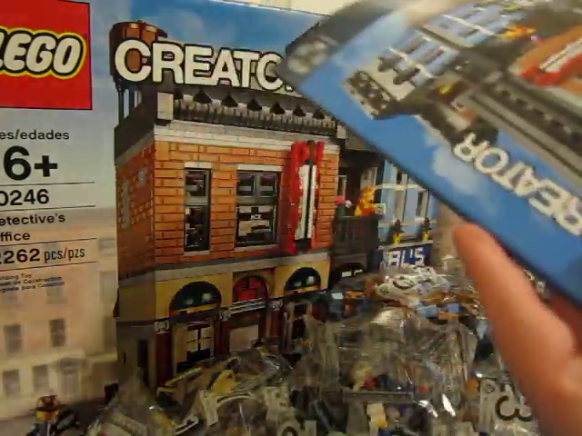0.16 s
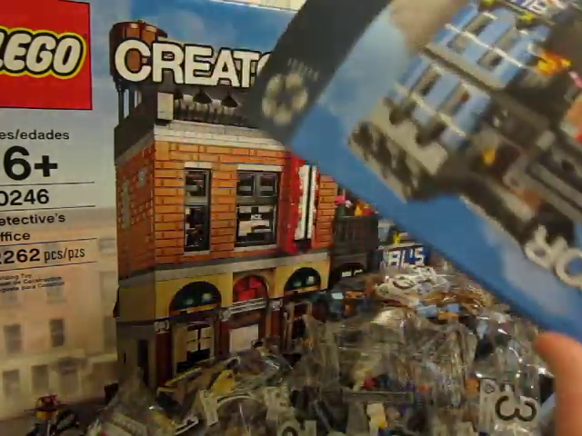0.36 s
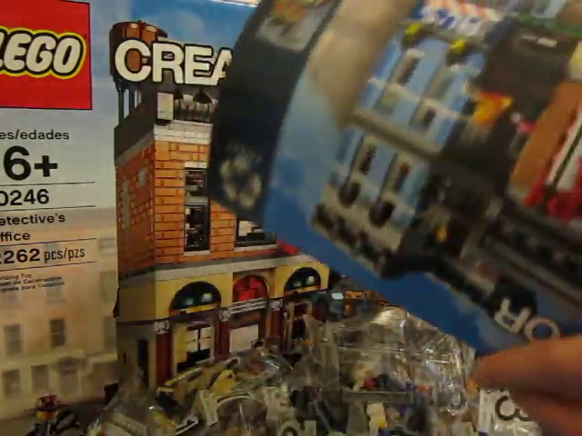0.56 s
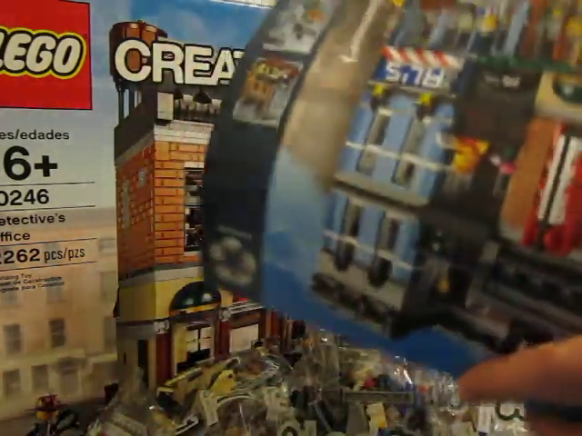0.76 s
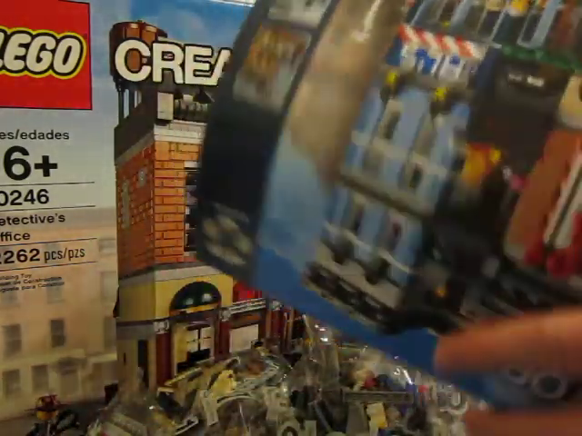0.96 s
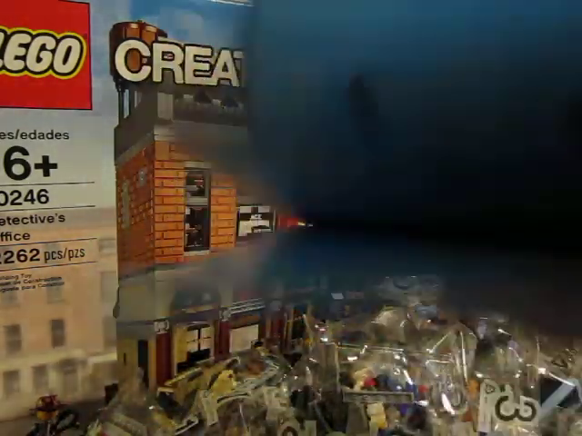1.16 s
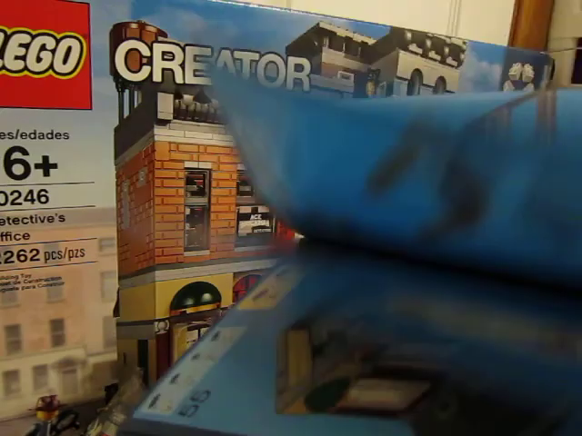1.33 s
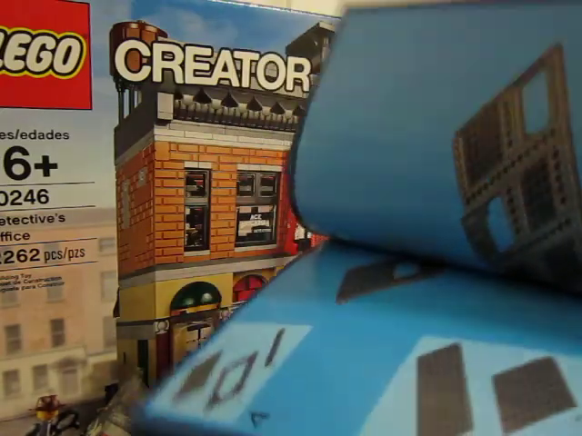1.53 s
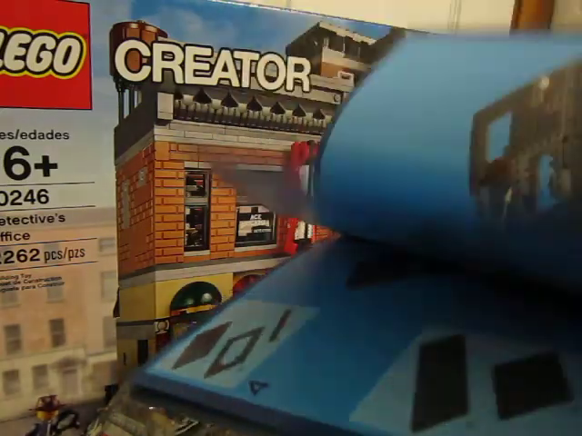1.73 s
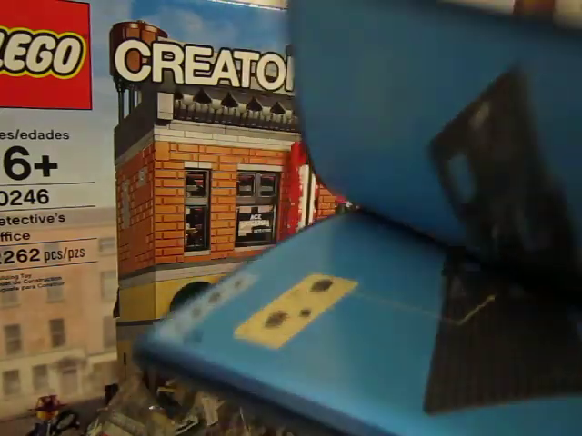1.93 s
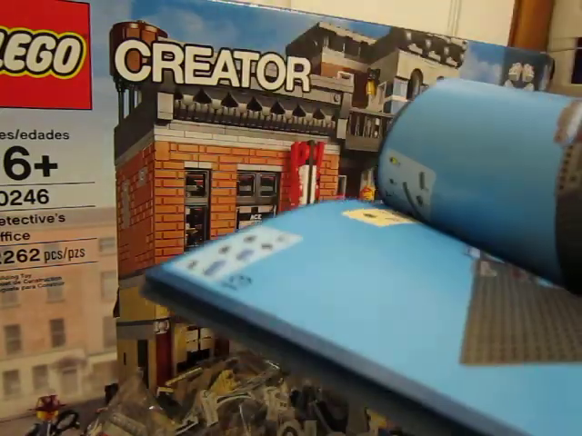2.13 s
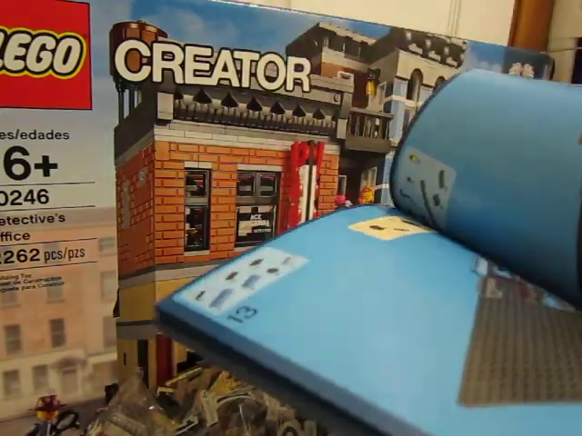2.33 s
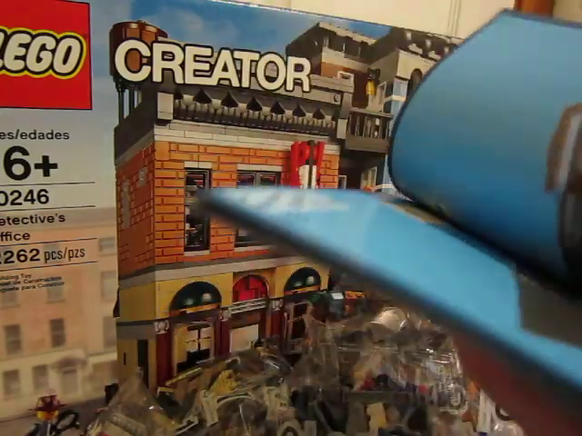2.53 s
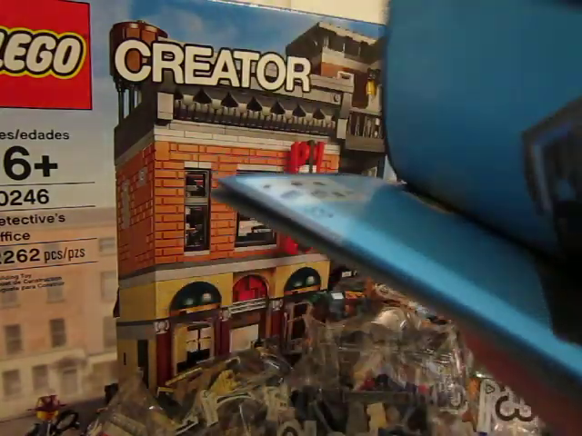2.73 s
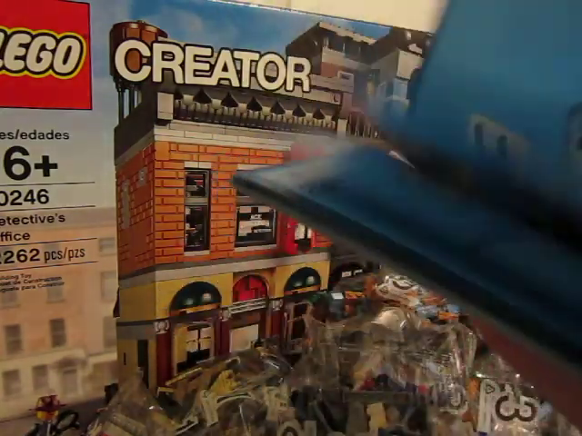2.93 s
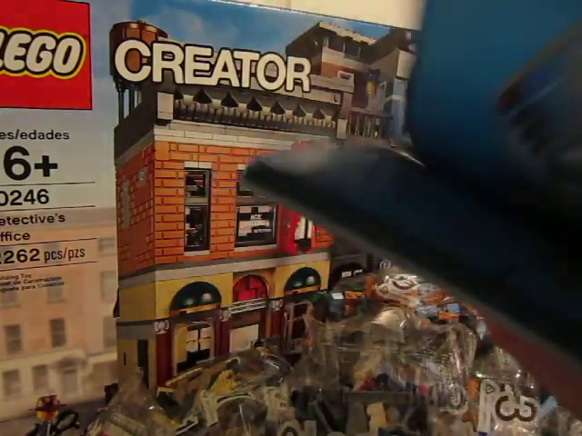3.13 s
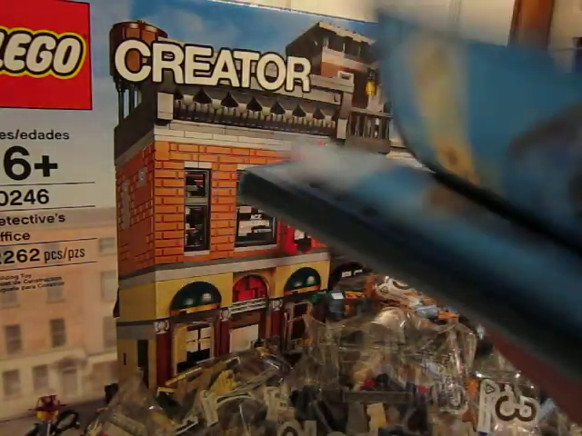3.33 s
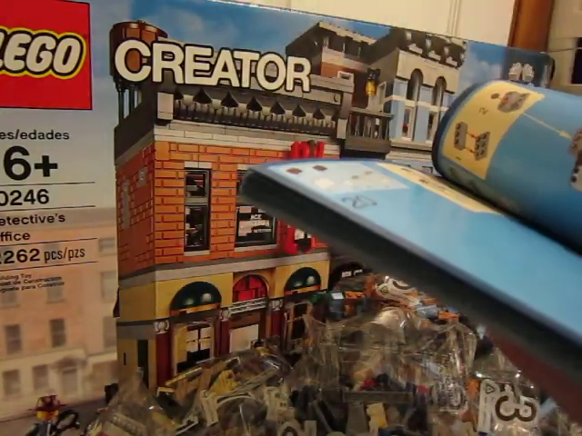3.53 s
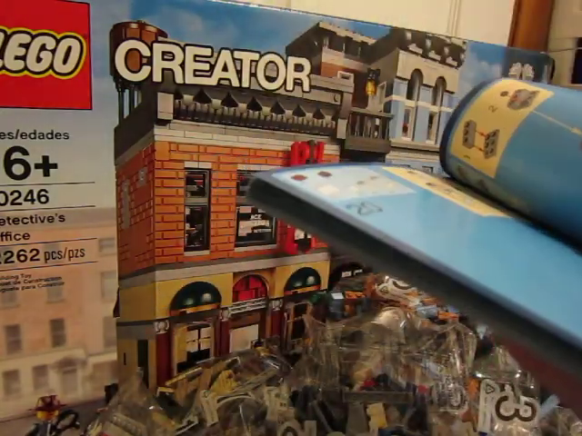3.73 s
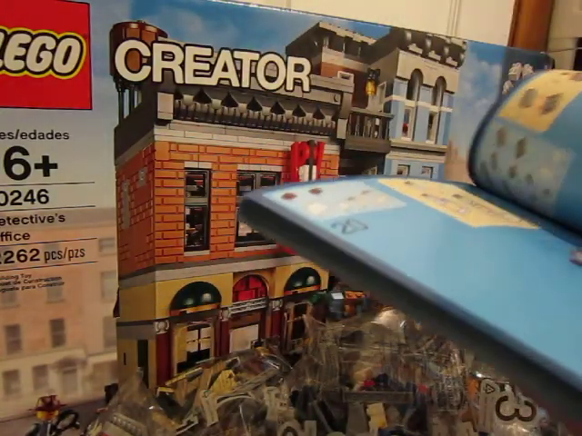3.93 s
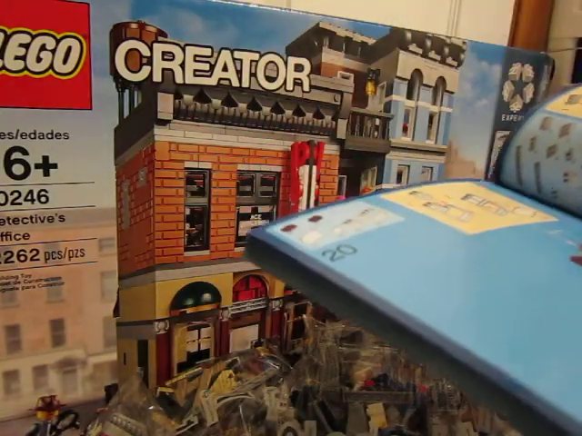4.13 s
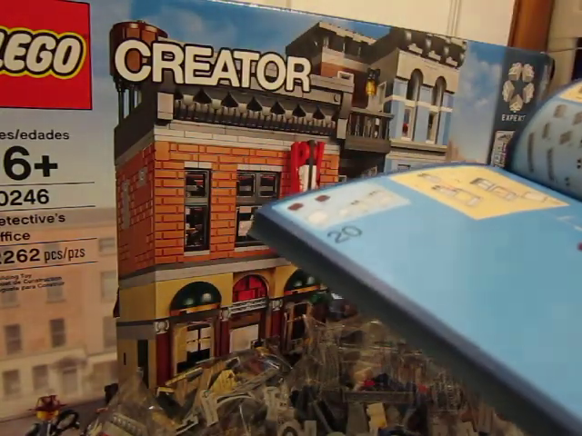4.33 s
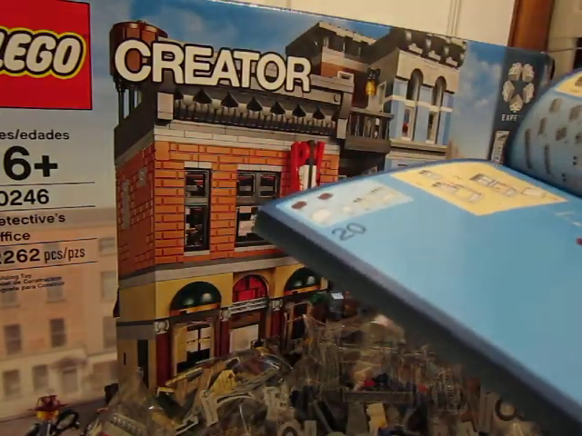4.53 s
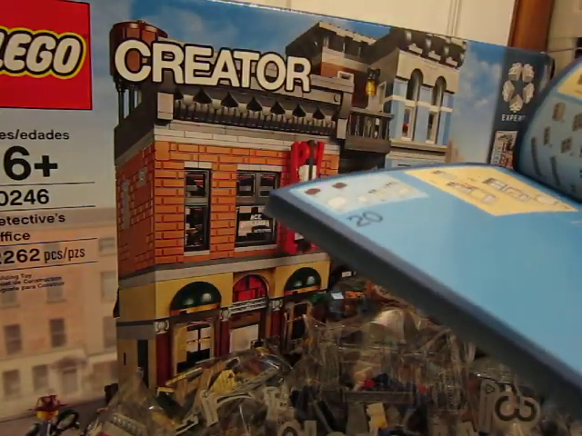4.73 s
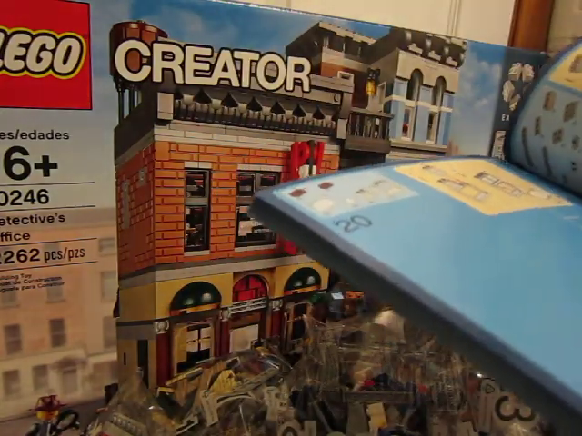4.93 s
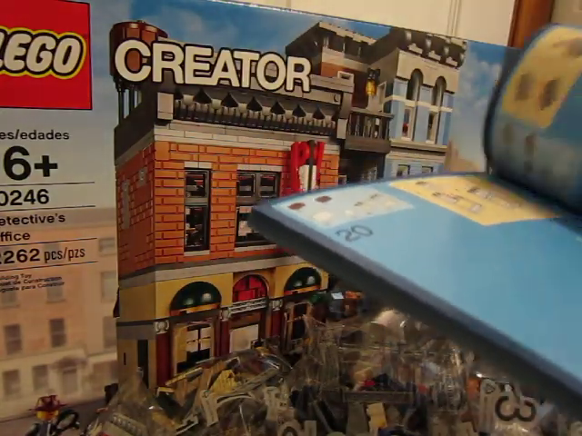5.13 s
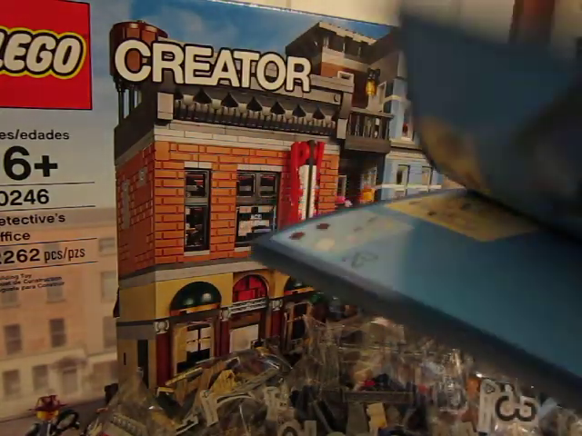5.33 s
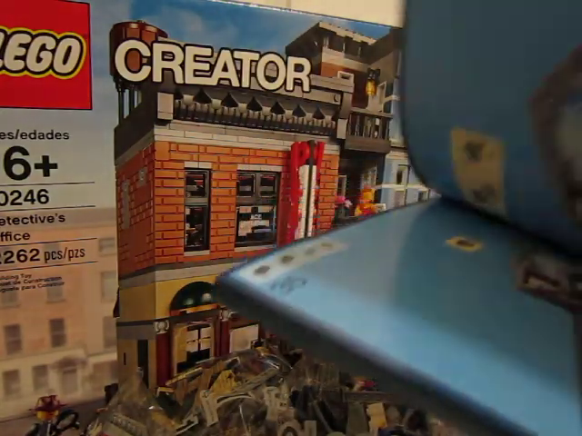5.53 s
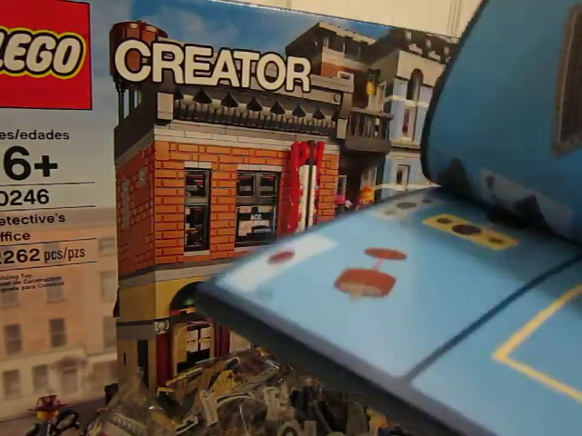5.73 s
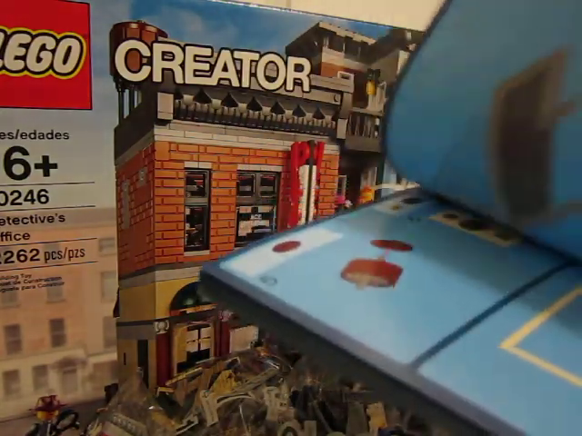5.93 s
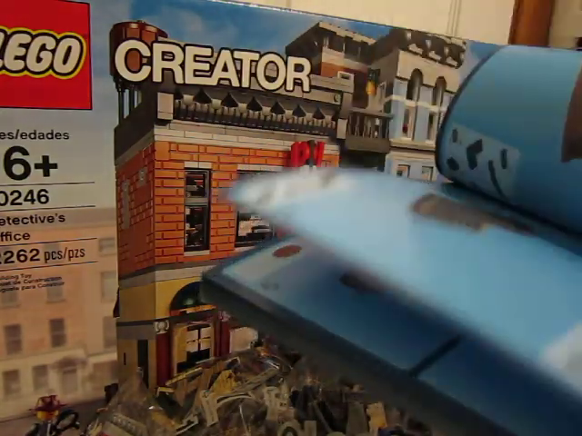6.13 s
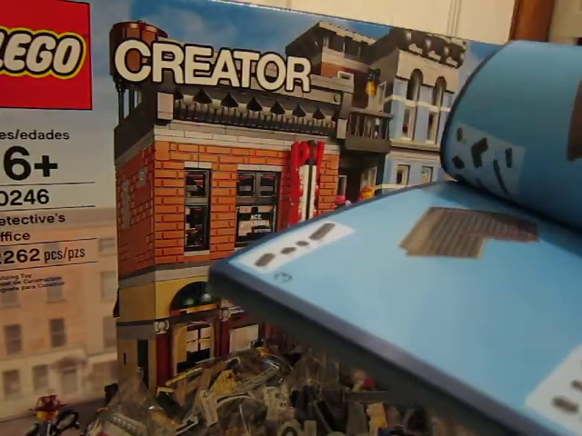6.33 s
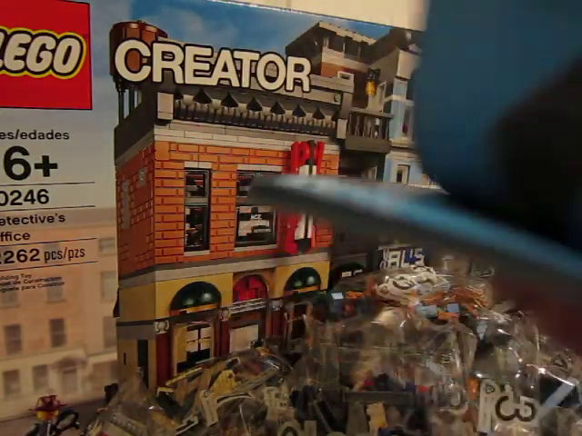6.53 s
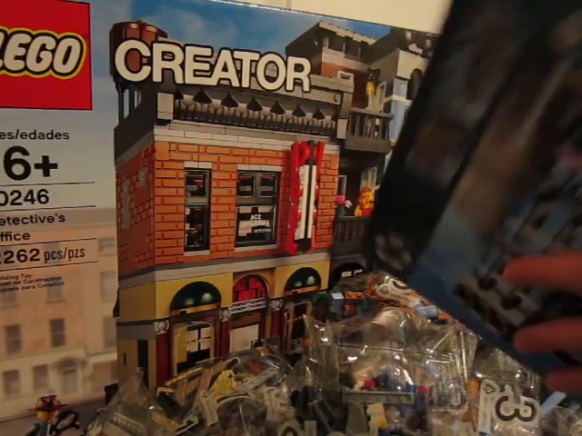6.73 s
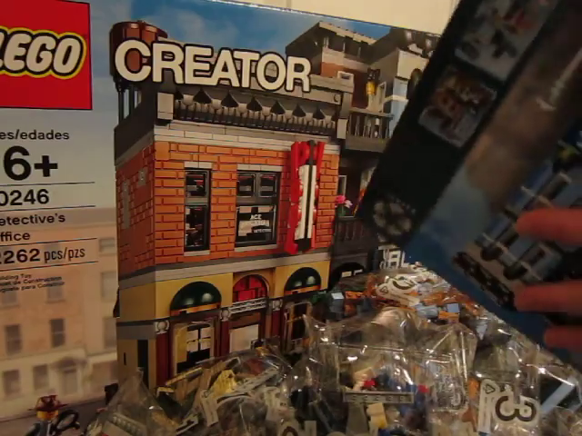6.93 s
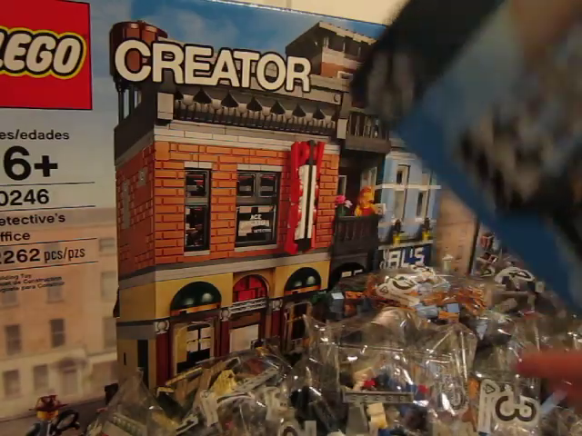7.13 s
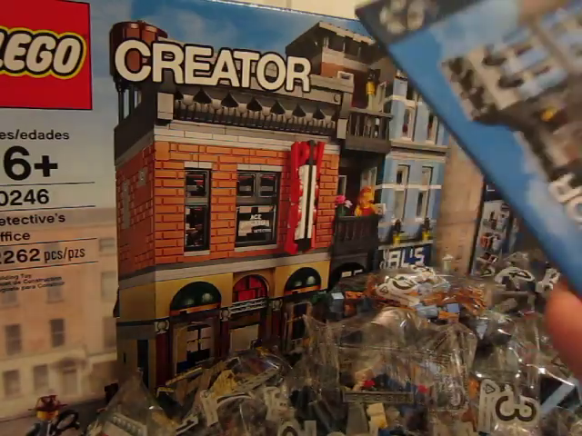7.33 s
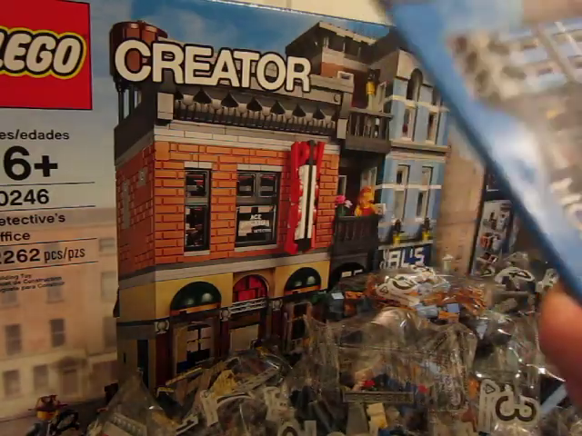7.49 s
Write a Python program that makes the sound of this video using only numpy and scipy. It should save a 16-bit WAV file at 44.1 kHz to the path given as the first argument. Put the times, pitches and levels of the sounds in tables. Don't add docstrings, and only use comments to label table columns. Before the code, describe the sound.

A thick paper booklet is turned over and leafed through very near the microphone. Dull cover pops and smooth skin hiss come first, then sharp page snaps, dense papery crackle and low bursts of wind. It calms to faint ticks, before a second flurry brings heavy air thuds, stiff sheet cracks and closing finger swishes. Faint low room noise stays underneath.

```python
import sys
import numpy as np
from scipy import signal
from scipy.fft import rfft, irfft, next_fast_len
from scipy.io import wavfile
from scipy.ndimage import uniform_filter1d

SR = 44100
rng = np.random.default_rng(int(sys.argv[2]) if len(sys.argv) > 2 else 0)


def boost_factor(decibels):
    exponent = np.asarray(decibels, float) / 20
    return 10 ** exponent


def persist_wave(psi):
    counts = np.round(np.clip(psi, -1, 1) * 32767).astype(np.int16)
    wavfile.write(sys.argv[1], SR, np.atleast_2d(counts).T)


N = 337742

# t/s, peak level/dB, sheet ring f/Hz, decay/ms
CLEAN_SNAPS = [(.595, -10.5, 3000, 1.5), (.929, -25.5, 8500, 3.1), (1.153, -10, 4370, 1.1),
               (1.638, -20.5, 2540, 1.7), (2.279, -30.5, 4500, 0.64), (2.321, -15.5, 4900, 1.3),
               (2.664, -27.5, 3600, 3.4), (2.8, -24.5, 2470, 2.9), (2.866, -30, 3500, 3.2),
               (2.999, -30.5, 7500, 2), (4.0115, -15, 5650, 0.48), (5.169, -37, 2460, 4.1),
               (5.327, -29, 2300, 5.7), (5.714, -15.5, 3400, 3.2), (7.599, -37, 950, 2.4),
               (1.445, -33.5, 1800, 3.3)]
# t/s, peak level/dB, sheet ring f/Hz, decay/ms
CRISP_SNAPS = [(.289, -39, 3230, 2.4), (1.079, -18.5, 3700, 7.3), (1.406, -32.5, 2800, 4),
               (1.667, -30.5, 1420, 3.7), (2.635, -17, 3800, 1.3), (2.679, -29, 2360, 2.3),
               (2.822, -27, 2370, 4.2), (3.006, -31, 1510, 4), (3.695, -42.5, 1840, 4.9),
               (4.87, -49, 2500, 1.8), (5.369, -29.5, 8000, 1.7), (6.588, -15, 3660, 5),
               (7.292, -36, 2100, 3.5), (7.619, -35.5, 960, 2)]
# t/s, peak level/dB, sheet ring f/Hz, decay/ms
HEAVY_SNAPS = [(.223, -25, 1870, 2.8), (.545, -33.5, 1100, 3), (1.167, -23.5, 1250, 5.6),
               (1.207, -31, 1590, 2.6), (1.309, -34, 715, 3.2), (1.792, -29.5, 1600, 3.2),
               (3.13, -33, 1320, 5.4), (3.932, -38.5, 507, 3.3), (5.249, -26, 895, 2.6),
               (5.397, -17.5, 2100, 1.9), (5.399, -28, 690, 11), (6.493, -26, 3000, 5.9),
               (6.578, -25, 2300, 8.8), (6.594, -13, 2900, 2.4), (7.246, -39, 4940, 3),
               (7.537, -36, 4010, 3.7)]
# t/s, peak level/dB, sheet ring f/Hz, decay/ms
THIN_SNAPS = [
    (2.753, -23.5, 3620, 3.7),
    (2.902, -22, 5700, 3.4),
    (2.929, -35, 3600, 2),
    (2.953, -24.5, 2390, 5.6),
    (3.057, -24, 2350, 2.4),
    (3.092, -33, 6500, 1),
]
# t/s, peak level/dB, sheet ring f/Hz, decay/ms
WIDE_SNAPS = [
    (2.333, -33.5, 4430, 2.7),
    (4.663, -37.5, 2470, 3),
    (4.697, -43, 1460, 2),
    (5.3, -32, 3200, 3.8),
    (5.427, -25.5, 1820, 6.4),
    (7.3, -34.5, 2460, 1.6),
    (7.376, -47, 1200, 1.3),
    (6.579, -31, 5400, 1.6),
    (1.338, -45, 4500, 3.6),
    (1.265, -55, 2200, 1.8),
]


def snaps():
    out = np.zeros(N)
    lead_ms = 30
    ms = np.arange(4000) * 1000 / SR - lead_ms
    kinds = (  # rows, crisp edge dB, dull flap dB
        (CLEAN_SNAPS, -17, -12),
        (CRISP_SNAPS, -2.5, -13),
        (HEAVY_SNAPS, -23, -1),
        (THIN_SNAPS, -11, -29),
        (WIDE_SNAPS, -1.5, 4.5))
    for rows, crisp_db, dull_db in kinds:
        for s, peak_db, hz, decay_ms in rows:
            scrape = 0.25 * np.exp(ms / 3.3)
            shape = np.where(ms < 0, scrape, np.exp(-ms / decay_ms))
            shape = shape + 0.2 * np.exp(-abs(ms - .3) / 1.2)
            crack = rng.standard_normal(len(ms)) * shape
            add(out, s - lead_ms / 1000, boost_factor(peak_db - 0.5) * sheet(crack, hz, crisp_db, dull_db))
    return out


# centre t/s, peak level/dB, sheet ring f/Hz, half length/ms
CRISP_SCUFFS = [(.265, -25, 2640, 11), (.5955, -18.5, 6300, 1.7), (1.112, -20, 3100, 5.6),
                (1.429, -33.5, 3800, 9.8), (1.655, -36, 2600, 5.3), (1.693, -37, 3200, 5.4),
                (1.865, -45, 4160, 42), (2.346, -36, 4960, 18), (2.389, -39.5, 4670, 37),
                (2.718, -29.5, 3180, 5.1), (3.81, -37, 4250, 14), (5.198, -27, 4170, 3.2),
                (5.232, -31, 2800, 11.5), (5.514, -35.5, 2390, 11), (6.344, -36.5, 4100, 9.3),
                (6.502, -28, 3500, 4.7), (7.495, -37.5, 2500, 22), (7.578, -44, 7950, 2.7)]
# centre t/s, peak level/dB, sheet ring f/Hz, half length/ms
RINGING_SCUFFS = [
    (1.184, -20.5, 3730, 1.4),
    (1.242, -26.5, 1500, 4.2),
    (1.345, -37.5, 2940, 4.3),
    (3.11, -30.5, 6300, 4.2),
    (3.235, -41.5, 840, 19),
    (5.435, -33, 1410, 8.7),
    (5.722, -22, 1760, 8),
    (5.74, -45, 2000, 21),
]
# centre t/s, peak level/dB, sheet ring f/Hz, half length/ms
DULL_SCUFFS = [(2.05, -47.5, 1480, 17), (2.915, -43, 1380, 16), (2.939, -41, 1800, 6.7),
               (3.145, -40.5, 1520, 11.6), (3.171, -43.5, 1500, 8.9), (5.269, -46, 1310, 11),
               (5.563, -45.5, 1500, 13.5), (6.155, -50, 1830, 13), (6.609, -42.5, 3200, 16),
               (6.891, -50, 890, 10), (6.917, -49.5, 870, 7.8)]
# centre t/s,
# peak level/dB, sheet ring f/Hz, half length/ms
SLAP_SCUFFS = [(6.37, -38, 2800, 9.8), (6.386, -21, 2440, 4), (6.413, -20, 3480, 9.9),
               (6.4188, -8.5, 3260, 0.76), (6.4195, -15.5, 3240, 5.3), (6.409, -26, 2400, 2.5),
               (6.455, -49, 2300, 20), (6.46, -45, 3200, 19), (.686, -31, 680, 15), (3.8, -40, 2930, 4),
               (3.84, -40.5, 2880, 34)]


def scuffs():
    out = np.zeros(N)
    lead_ms = 30
    ms = np.arange(4000) * 1000 / SR - lead_ms
    kinds = (  # rows, crisp edge dB, dull flap dB
        (CRISP_SCUFFS, -4, -8.5),
        (RINGING_SCUFFS, -35, -6),
        (DULL_SCUFFS, -45, 11),
        (SLAP_SCUFFS, -9, -20.5))
    for rows, crisp_db, dull_db in kinds:
        for s, peak_db, hz, half_ms in rows:
            scuff = uneven(len(ms), 4.2, 1.0) * np.exp(-(ms / half_ms) ** 2)
            add(out, s - lead_ms / 1000, boost_factor(peak_db) * sheet(scuff, hz, crisp_db, dull_db))
    return out


# t/s, peak level/dB, sheet ring f/Hz, half
# length/ms
CORNER_TICKS = [(0.291, -35, 1000, 1.5), (.531, -36, 1300, 1), (1.056, -25, 2000, 1.2),
                (1.07, -25, 1620, 2.3), (1.113, -19, 2100, 1.4), (1.177, -29, 4000, 2.6),
                (1.187, -21.5, 4500, 1), (1.256, -35, 1900, .6), (1.267, -34, 1880, 0.42),
                (1.311, -32, 1780, 0.55), (1.339, -35, 3200, .6), (1.38, -37, 1500, 1.3),
                (1.409, -26, 4300, 1.7), (1.429, -37, 4700, 3), (2.679, -36, 6500, 1.2),
                (2.693, -32, 2200, 1), (2.71, -30, 1200, 2.1), (2.767, -29, 3300, 1), (2.803, -30, 5500, 1),
                (2.823, -22, 4100, 1), (2.881, -30, 3500, 1), (2.904, -21.5, 2200, 0.81),
                (2.929, -19.5, 6000, .8), (2.93, -25, 9200, 0.88), (2.931, -22.5, 2090, 1.5),
                (2.955, -20, 5330, 1.2), (3.008, -24, 4900, 1.2), (3.026, -32, 2000, 1.5),
                (3.06, -23, 5660, 1), (3.141, -32, 3000, 1), (3.168, -42, 2500, 1), (3.187, -45, 2140, 1),
                (3.21, -41, 2030, 1),
                (5.192, -29, 2700, 1.9), (5.229, -24, 1890, 1.5), (5.229, -28, 3800, 1.2),
              (5.236, -25, 7000, 0.91), (5.265, -30, 900, 2), (5.302, -23.5, 4000, 1.5),
              (5.338, -33, 4100, 1.2), (5.371, -36, 2600, .8), (5.402, -19, 2300, 2.2),
              (5.411, -36, 1800, 1.5), (5.427, -26, 4500, .6), (5.56, -34, 960, 5.6), (5.575, -35, 880, 4),
              (5.721, -32, 860, 4.7), (5.741, -33, 990, 6.2), (6.126, -39.5, 1800, 3),
              (6.325, -39, 3960, 1.1), (6.375, -34, 1310, 6.3), (6.38, -25, 2410, 2.8),
              (6.386, -22, 4470, 1.3), (6.403, -33, 960, 5), (6.407, -23, 2450, 2), (6.419, -8, 3500, 0.56),
              (6.4935, -26, 5000, 0.57), (6.581, -19, 1960, 3), (6.5883, -22, 5860, 1.4),
              (6.5955, -8.5, 3800, 1.1), (6.598, -18, 4530, 1.5), (6.618, -40, 3400, 6),
              (6.635, -34, 3500, 4),
                (.595, -10.5, 10500, 1), (.609, -30, 6500, 1), (1.639, -28.5, 5370, 1.4),
               (1.667, -24, 3530, 0.88), (1.803, -48, 3000, .8), (1.879, -39, 1500, 1.5),
               (1.947, -43, 2000, 1.3), (1.975, -43, 3020, 1.5), (2.322, -29, 12000, 1),
               (2.345, -32.5, 11500, 8), (2.39, -37, 11500, 8), (3.705, -44, 4500, 2), (3.8, -41, 11500, 2),
               (4.012, -32, 12500, .5), (4.013, -32, 2030, 1.3), (4.875, -49, 5000, 1),
               (5.37, -36, 12500, .6), (5.428, -25, 11500, .8), (5.4, -27, 345, 5), (6.878, -42, 810, 1.6),
               (6.976, -38, 1400, 4.2), (7.123, -34, 2600, .8), (7.248, -35, 2000, 0.68),
               (7.255, -37, 2000, .8), (7.265, -32, 4100, .8), (7.309, -27, 3800, .5),
               (7.377, -40, 3000, .7), (7.378, -35, 440, 4.2), (7.419, -38, 900, 1.5),
               (7.506, -41, 5500, .8), (7.58, -38, 11500, 1.5), (7.601, -40, 7000, .7),
               (7.617, -37, 10000, 1.5), (7.626, -40, 11500, .8), (.224, -29, 930, 1.5),
               (.268, -39, 1200, 4), (.705, -43, 900, 6), (.075, -39, 3200, 11), (.97, -32.5, 2200, 31),
               (6.595, -20, 770, 1.7), (7.082, -20, 11500, 1), (3.131, -23.5, 1100, 1)]


def ticks():
    out = np.zeros(N)
    lead_ms = 30
    ms = np.arange(2400) * 1000 / SR - lead_ms
    for s, peak_db, hz, half_ms in CORNER_TICKS:
        flick = rng.standard_normal(len(ms)) * np.exp(-abs(ms) / half_ms)
        flick[abs(ms).argmin()] += 2.5
        tick = sheet(flick, hz, crisp_db=-15, dull_db=-29)
        add(out, s - lead_ms / 1000, boost_factor(peak_db - 1.0) * tick)
    return out


# t/s, peak level/dB, sheet mode f/Hz, decay/ms
PINGS = [
    (6.4188, -10, 3280, 0.58),
    (.5919, -20, 7000, 0.26),
    (.5962, -14.5, 6300, .6),
    (1.1532, -18.5, 2300, 0.5),
    (2.6374, -26.5, 4630, 0.45),
    (6.4189, -12, 2100, .8),
    (6.432, -27, 3150, 0.89),
]


def pings():
    out = np.zeros(N)
    blow = signal.unit_impulse(SR // 20)
    for s, peak_db, hz, decay_ms in PINGS:
        width = 1000 / (np.pi * decay_ms)
        ring = resonate(resonate(blow, hz, width), hz, width)
        add(out, s - decay_ms / 1000, boost_factor(peak_db) * ring / abs(ring).max())
    return out


# f/Hz, level/dB per Hz
SLIDE = [(1470, -42), (2500, -13), (3860, -10), (4620, -6), (7530, -2), (9580, 0), (13500, -3.5),
         (16000, -16)]
# touch t/s, lift t/s, hiss level/dB, change over the stroke/dB
GLIDES = [(-.05, 0.177, -47.5, -3), (0.209, 0.37, -46.5, 11.5), (0.424, 0.686, -39.5, -0.5),
          (0.727, 0.727, -52.5, 9), (0.79, 0.853, -50.5, -3), (0.934, 1.143, -36, 1.5),
          (1.15, 1.3, -49.5, -27), (1.344, 1.357, -56, -1), (1.972, 2.214, -67, 1), (2.364, 3.103, -57, -7),
          (3.065, 3.452, -66, 2.5), (3.78, 4.235, -67, 2), (5.01, 5.535, -66, 5), (6.327, 6.474, -59.5, 0),
          (6.516, 6.584, -46, -8), (6.61, 6.74, -54.5, -7), (6.733, 6.92, -50.5, 6), (6.968, 7.078, -47, 8),
          (7.077, 7.288, -39.5, -9), (7.293, 7.393, -42, -12), (7.436, 7.56, -55, -21),
          (7.616, 7.7, -56, -11)]


def finger_glides():
    t = np.arange(N) / SR
    gain = sum(stroke(t, 0.075, *row) for row in GLIDES)
    hiss = patchy(coloured(uneven(N, 6.2, 0.94), SLIDE), 2.4)
    return boost_factor(2.5) * gain * hiss


# f/Hz, level/dB per Hz
RUSTLE = [(300, -45), (800, -19), (1400, -5), (2300, 1.5), (3900, 1.5), (6000, 0), (8000, -4.5),
          (12000, -14.5), (16000, -55)]
# f/Hz, level/dB per Hz
FLUTTER = [(150, -36), (350, 0), (900, 2), (1500, -0.5), (2600, -7), (5000, -58)]
# start t/s, end t/s, rustle level/dB, change over the stroke/dB,
# flutter against rustle/dB
LEAFING = [(0, 0.62, -49, 1.5, -0.5), (0.597, 1.023, -51, 5, -10), (0.95, 1.223, -48, 9, -1),
           (1.187, 1.476, -60.5, 5, 8), (1.42, 2.316, -65, -9, 4.5), (2.386, 2.61, -53, 10.5, -28),
           (2.634, 3.024, -41, -0.5, -3), (3.07, 3.374, -46, -19, -1), (3.784, 4.287, -56, -12.5, -2),
           (5.145, 5.55, -50.5, -1, -7), (6.42, 6.6, -51, 16, -34), (6.625, 7.003, -48.5, 2.5, -14),
           (7, 7.2, -61.5, 17, -11), (7.19, 7.328, -49.5, 9, -16), (7.27, 7.696, -56, 4.5, -7.5)]


def leafing():
    t = np.arange(N) / SR
    rustle_gain, flutter_gain = boost_factor(-61.5), boost_factor(-63)
    for *row, dull_db in LEAFING:
        move = stroke(t, 0.12, *row)
        rustle_gain = rustle_gain + move
        flutter_gain = flutter_gain + move * boost_factor(dull_db)
    crackle = 0.56 * grains(1500, 2.1, 2.3) + 0.91 * uneven(N, 12.0, 2.8)
    rustle = boost_factor(-4.5) * rustle_gain * patchy(coloured(crackle, RUSTLE), 2.14)
    flutter = boost_factor(-3.0) * flutter_gain * coloured(uneven(N, 4.2, 3.2), FLUTTER)
    return rustle + flutter


# f/Hz, width/Hz
COVER_MODES = [(2110, 370), (3260, 280)]
# start t/s, end t/s, level/dB, change over the stroke/dB
LOW_RUBS = [
    (.21, .34, -50, -5),
    (0.342, 0.62, -50, -5),
]
# start t/s, end t/s, level/dB, change over the stroke/dB
HIGH_RUBS = [
    (0.226, 0.51, -49, -1),
]


def cover_rubs():
    out = np.zeros(N)
    t = np.arange(0, 1.2, 1 / SR)
    for rows, (hz, width) in zip((LOW_RUBS, HIGH_RUBS), COVER_MODES):
        friction = uneven(len(t), 6.5, 0.53)
        mode = resonate(resonate(friction, hz, width), hz, width)
        gain = sum(stroke(t, 0.15, *row) for row in rows)
        add(out, 0, boost_factor(5.5) * evened(mode) * gain)
    return out


# t/s, peak level/dB, ring f/Hz, decay/ms
POPS = [(.0035, -19, 515, 4.7), (.016, -23.5, 430, 3.3), (0.0238, -21, 550, 3.9), (.054, -33, 557, 4),
        (0.061, -25.5, 380, 4.7), (.075, -24.5, 530, 4.6), (.653, -36.5, 252, 6.3), (.672, -27, 496, 5.9),
        (.678, -22.5, 1150, 1), (.683, -30, 600, 1.8), (.689, -23, 500, 1.5), (.699, -30, 740, 3.3),
        (.689, -30, 1400, 1.2), (0, -25.5, 530, 5.5), (.068, -31, 660, 3), (.08, -27.5, 800, 2.2),
        (.093, -31, 487, 1.5)]


def cover_pops():
    out = np.zeros(N)
    ms = np.arange(1500) * 1000 / SR
    for s, peak_db, hz, decay_ms in POPS:
        kick = (0.8 + rng.standard_normal(len(ms))) * ms * np.exp(-ms / 0.34)
        ring = resonate(kick, hz, 1000 / (np.pi * decay_ms))
        ring = resonate(ring, hz, 3.2 * hz)
        add(out, s, boost_factor(peak_db) * ring / abs(ring).max())
    return out


# start t/s, end t/s, level/dB, change over the gust/dB,
# fast part level/dB
GUSTS = [
    (0.642, 0.739, -36, -0.5, 0.5),
    (1.07, 1.265, -34, -4, -5),
    (1.246, 1.419, -31, -2, -11.5),
    (2.67, 3.197, -47, -1.5, -7),
    (3.21, 3.34, -33, -1, -37),
    (5.21, 5.54, -42.5, -3.5, 1),
    (5.565, 5.716, -33, -2, 6),
    (6.556, 6.685, -36.5, 3.5, -5),
    (6.77, 7.008, -41, 3.5, -6),
]


def puffs():
    t = np.arange(N) / SR
    slow_curve = [(12, -53), (25, 15.0), (70, -3.0), (110, -52), (300, -112)]  # f/Hz, level/dB per Hz
    fast_curve = [(50, -34), (95, 2.0), (200, -8.0), (450, -21), (1200, -103)]
    slow = coloured(rng.standard_normal(N), slow_curve)
    fast = coloured(uneven(N, 6.1, 18.0), fast_curve)
    slow /= np.sqrt(uniform_filter1d(slow ** 2, 2400) + 0.021)
    fast /= np.sqrt(uniform_filter1d(fast ** 2, 6000) + 0.034)
    out = np.zeros(N)
    for *row, fast_db in GUSTS:
        out += stroke(t, 0.026, *row) * (slow + boost_factor(fast_db - 1.5) * fast)
    return out


# t/s, peak level/dB, quickness
# f/Hz
BUFFETS = [(1.26, -23, 76), (1.277, -20, 61), (1.311, -17, 80), (1.327, -20.5, 35), (1.38, -11.5, 43),
           (1.42, -29, 30), (3.253, -28, 45), (5.563, -17, 45), (5.572, -7, 96), (5.583, -11, 180),
           (5.606, -19, 131), (5.615, -10.5, 113), (5.623, -12.5, 40), (5.633, -23, 90), (5.653, -28, 100),
           (5.66, -22, 90), (5.667, -17, 111), (5.68, -9.5, 70), (5.686, -16, 59.5), (5.699, -17.5, 91),
           (6.51, -24.5, 40), (6.581, -27, 50), (5.4, -23.5, 206), (7.378, -35, 200), (6.706, -21, 100),
           (6.715, -31, 130), (6.725, -18, 137), (6.733, -27, 150), (6.741, -18.5, 55), (6.826, -26, 45)]
# t/s, peak level/dB, quickness f/Hz
SUCKS = [(1.266, -18.5, 117), (1.305, -20, 29), (1.369, -29, 31), (1.396, -23, 23), (5.579, -18, 30),
         (5.602, -15.5, 62), (5.611, -28, 50), (5.637, -18, 69), (5.648, -24, 60), (5.673, -14.5, 40),
         (5.704, -17, 40), (6.495, -23, 147), (6.59, -23.5, 42), (6.632, -26.5, 17), (6.758, -15.5, 37),
         (6.813, -24, 83)]


def buffets():
    out = np.zeros(N)
    lead_s = 0.05
    t = np.arange(4410) / SR - lead_s
    for rows, sign in ((BUFFETS, 1), (SUCKS, -1)):
        for s, peak_db, hz in rows:
            u = (np.pi * hz * t) ** 2
            add(out, s - lead_s, sign * boost_factor(peak_db) * (1 - u) * np.exp(-u))
    return out


def room(x):
    wall_s, wall_db = 0.011, -26
    tail_t60, tail_db = 0.19, -15.5
    t = np.arange(SR // 2) / SR
    tail = band(rng.standard_normal(len(t)), 250, 11500, order=1)
    tail *= boost_factor(-60 * t / tail_t60) * (t > .004)
    tail *= boost_factor(tail_db) / np.linalg.norm(tail)
    tail[round(wall_s * SR)] += boost_factor(wall_db)
    return x + signal.fftconvolve(x, tail)[:N]


# f/Hz, level/dB per Hz
ROOM = [(12, -5), (20, 2), (107, -9.5), (150, -18), (168, -20.5), (347, -23), (542, -28.5), (1530, -36),
        (16000, -51.5)]


def room_noise():
    return boost_factor(-43) * coloured(uneven(N, 43.0, 0.67), ROOM)


def sheet(push, hz, crisp_db, dull_db):
    ring = evened(resonate(resonate(push, hz, 0.25 * hz), hz, 0.25 * hz))
    neighbours = evened(band(push, 0.56 * hz, 1.8 * hz, order=4))
    ring = ring + 1.12 * neighbours
    crisp = band(push, 4400, 9200)
    dull = band(push, 140, 1500)
    parts = ((ring, 0), (crisp, crisp_db), (dull, dull_db))
    return sum(boost_factor(db) * part / abs(part).max() for part, db in parts)


def grains(per_s, spread_db, cycles):
    happens = rng.random(N) < per_s / SR
    size = boost_factor(spread_db * np.minimum(rng.exponential(1, N), 4)) * happens
    pitches = np.geomspace(450, 11000, 20)
    kind = rng.integers(0, len(pitches), N)
    out = np.zeros(N)
    for k, hz in enumerate(pitches):
        turns = np.arange(int(3 * cycles * SR / hz)) * hz / SR
        wavelet = np.sin(2 * np.pi * turns) * np.exp(-turns / cycles) * hz
        out += signal.oaconvolve(size * (kind == k), wavelet)[:N]
    return evened(out)


def stroke(t, ramp_s, start, end, db, change_db):
    inside = np.clip(np.minimum(t - start, end - t) / ramp_s + .5, 0, 1)
    progress = np.clip((t - start) / (end - start), 0, 1)
    return np.sin(np.pi / 2 * inside) ** 2 * boost_factor(db + change_db * progress)


def uneven(count, ms, depth_db):
    span = max(int(ms * SR / 1000), 1)
    wander = uniform_filter1d(rng.standard_normal(count), span)
    wander = evened(uniform_filter1d(wander, span))
    return evened(rng.standard_normal(count) * boost_factor(depth_db * wander))


def patchy(x, depth_db):
    z = signal.stft(x, nperseg=256)[2]
    field = uniform_filter1d(rng.standard_normal(z.shape), size=9, axis=0)
    field = uniform_filter1d(field, size=14, axis=1)
    z = z * boost_factor(depth_db * evened(field))
    return evened(signal.istft(z, nperseg=256)[1][:len(x)])


def coloured(x, points):
    hz, db = np.transpose(points)
    size = next_fast_len(len(x))
    bins = np.fft.rfftfreq(size, 1 / SR)
    gain = boost_factor(np.interp(np.log(bins + 1), np.log(hz + 1), db))
    return evened(irfft(rfft(x, size) * gain, size)[:len(x)])


def resonate(x, hz, width):
    turn = np.exp(2j * np.pi * np.cumsum(hz * np.ones(len(x))) / SR)
    r = np.exp(-np.pi * width / SR)
    return 2 * (turn * signal.lfilter([1 - r], [1, -r], x / turn)).real


def band(x, lo_hz, hi_hz, order=2):
    sos = signal.butter(order, [lo_hz, min(hi_hz, SR / 2.2)], "band", fs=SR, output="sos")
    return signal.sosfilt(sos, x)


def evened(x):
    return x / np.sqrt(np.mean(x ** 2) + 1e-20)


def add(mix, s, sound):
    part = mix[round(s * SR):][:len(sound)]
    part += sound[:len(part)]


def scene():
    paper = room(snaps() + scuffs() + ticks() + pings())
    hands = finger_glides() + leafing()
    cover = cover_rubs() + cover_pops()
    air = puffs() + buffets()
    return (paper + hands + cover + air + room_noise())[None]


def low_pass(x):
    return signal.sosfilt(signal.butter(12, 16520, fs=SR, output="sos"), x)


def record(dry):
    edge = signal.firwin(601, 15800, window=("kaiser", 9), fs=SR)
    finished = signal.oaconvolve(dry, edge[None], "same")
    return low_pass(finished)


dry = scene()
out = record(dry)
persist_wave(out)
```